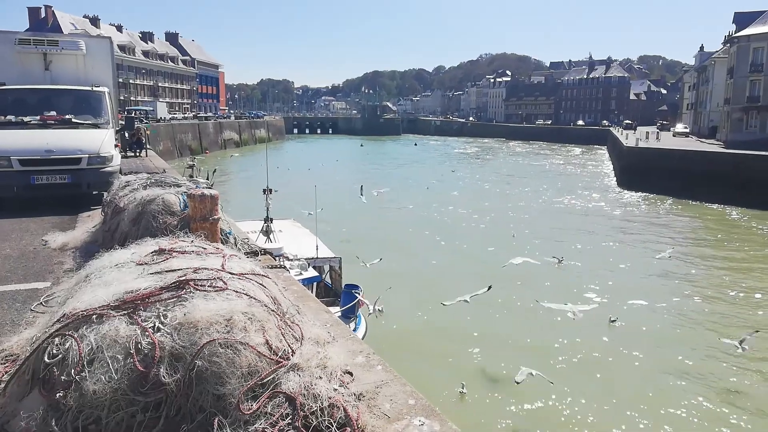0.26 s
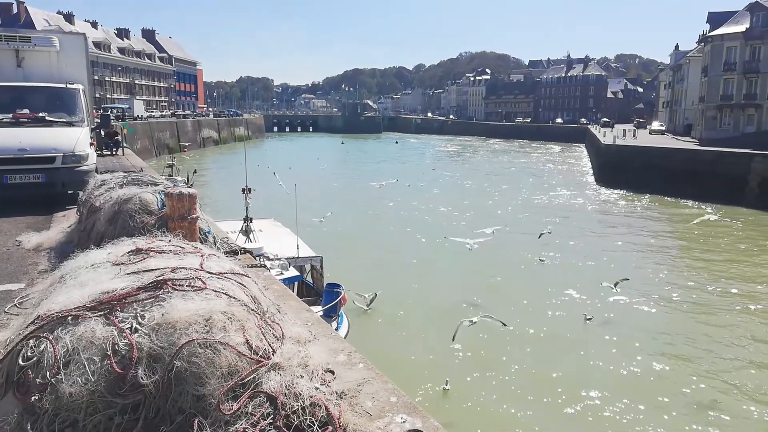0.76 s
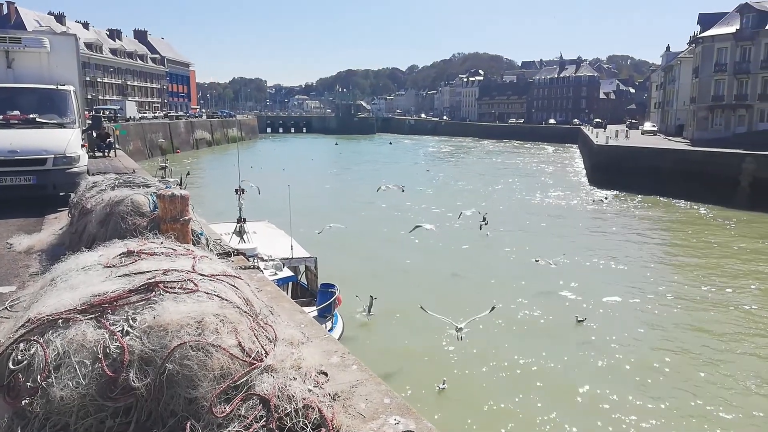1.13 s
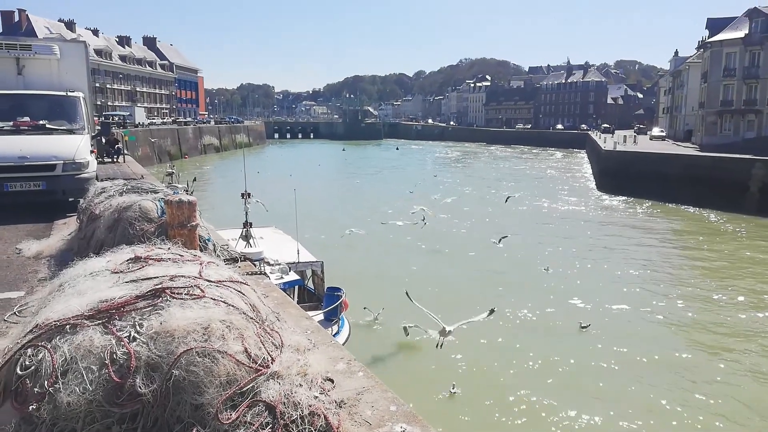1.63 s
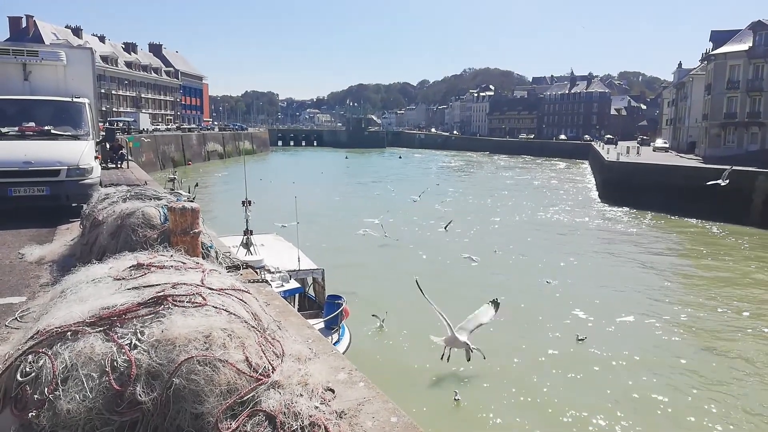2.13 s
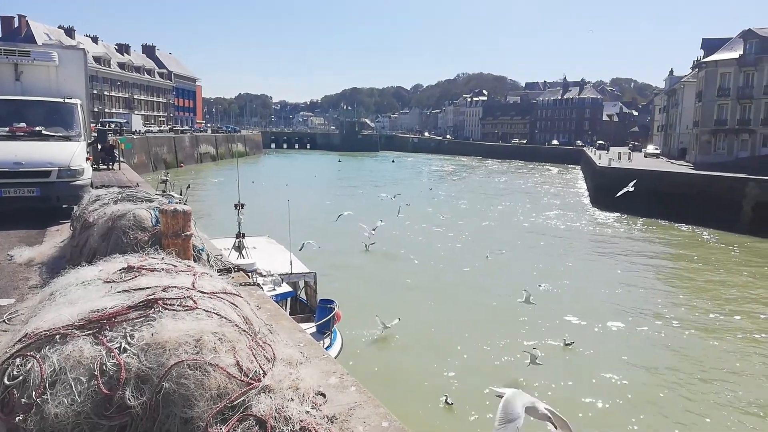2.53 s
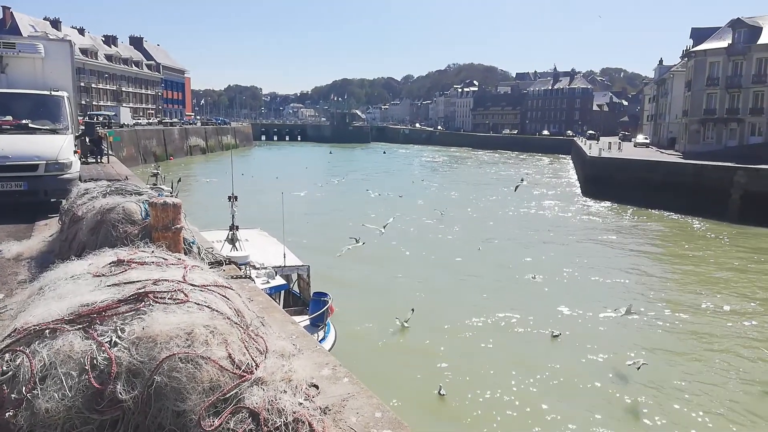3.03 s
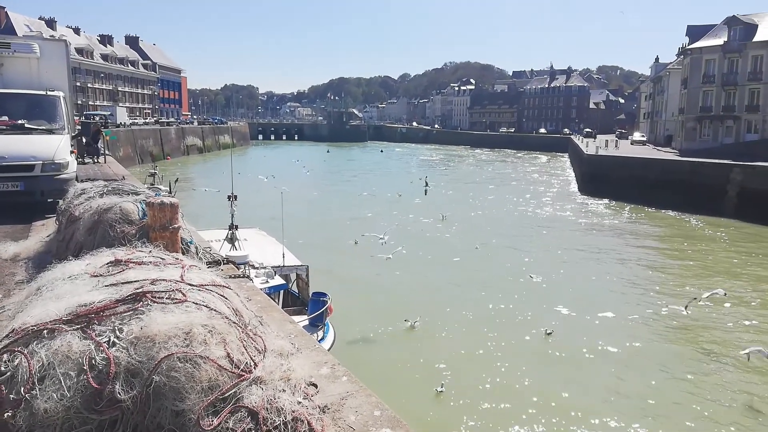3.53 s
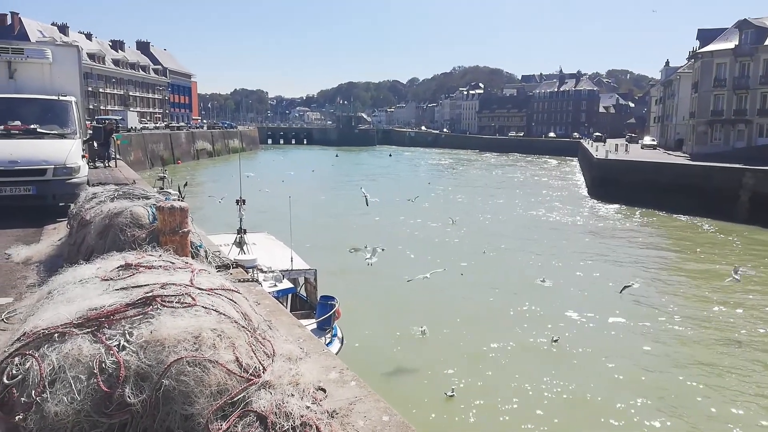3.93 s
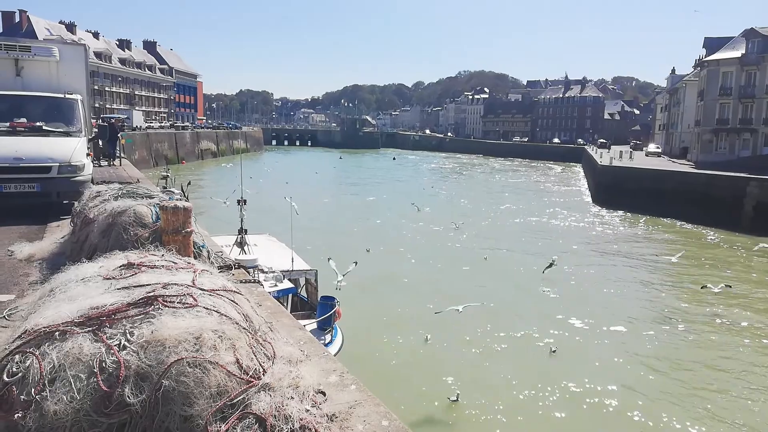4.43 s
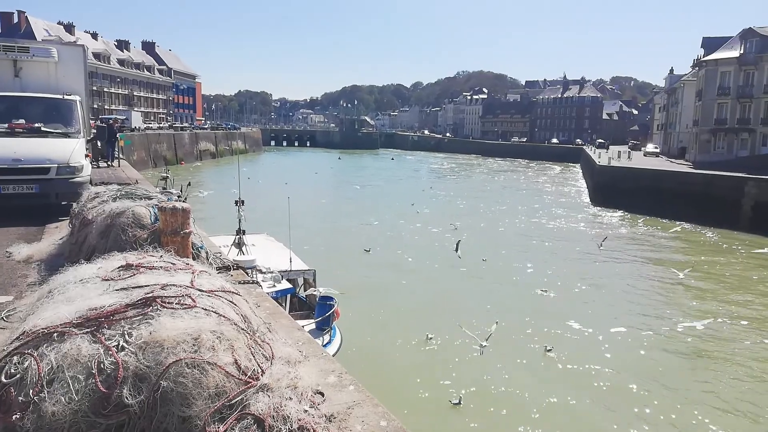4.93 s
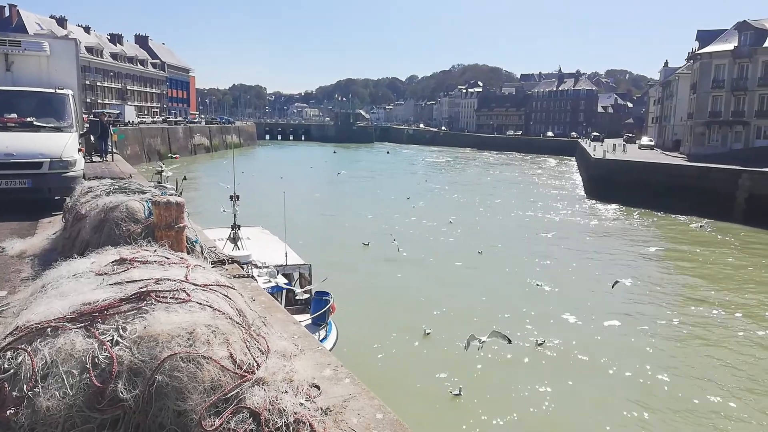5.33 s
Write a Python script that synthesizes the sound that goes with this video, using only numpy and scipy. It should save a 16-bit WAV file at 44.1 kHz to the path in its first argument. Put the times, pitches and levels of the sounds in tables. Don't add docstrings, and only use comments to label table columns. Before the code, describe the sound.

A harbour heard from the quay on a small stereo phone microphone. High gull whistles open, then wind buffets the microphone. From about two seconds a nearby gull gives clipped, falling chirps with croaky ends, three a second, while others mew further off. A boat diesel throbs very low throughout; late on, water washes harder against the wall.

```python
import sys
import numpy as np
from scipy import signal
from scipy.fft import rfft, irfft, next_fast_len
from scipy.io import wavfile
from scipy.ndimage import uniform_filter1d

SR = 44100
rng = np.random.default_rng(int(sys.argv[2]) if len(sys.argv) > 2 else 0)


def boost_factor(decibels):
    exponent = np.asarray(decibels, float) / 20
    return 10 ** exponent


def generate_wav(signal):
    frames = np.transpose(np.atleast_2d(signal))
    scaled = np.clip(frames, -1, 1) * 32767
    pcm = np.round(scaled).astype(np.int16)
    wavfile.write(sys.argv[1], SR, pcm)


N = 245751
TIME_S = np.arange(N) / SR

# start_s, length_s, first_hz, last_hz, level_db
WHISTLES = [(0.05, 0.028, 5350, 5200, -62), (0.079, 0.054, 4530, 4584, -47.5),
            (0.136, 0.114, 4590, 4385, -42), (0.264, 0.065, 3934, 3830, -50),
            (1.305, 0.11, 3724, 3526, -44), (1.452, 0.044, 3540, 3500, -64), (1.59, 0.05, 3680, 3600, -63),
            (1.709, 0.0497, 3620, 3550, -64), (1.482, 0.054, 5130, 5030, -62.5),
            (1.574, 0.062, 4990, 5110, -56), (1.642, 0.017, 5600, 5750, -54),
            (1.658, 0.012, 5730, 5350, -53), (1.656, 0.013, 5340, 5300, -52),
            (1.661, 0.023, 5280, 4930, -54)]
# pitch_hz, left_minus_right_db, left_lead_rad
WHISTLE_SIDE = [(3600, 25, 4.8), (3950, 17, 3.9), (4550, -6.5, 2.6), (5130, 6, 0.58)]
# start_s, length_s, first_hz, level_db
STEPS = [(0.112, 0.012, 4000, -55), (1.694, 0.0088, 3600, -42.5), (1.698, 0.014, 2780, -48),
         (1.702, 0.009, 5520, -54), (1.941, 0.013, 4600, -57), (1.972, 0.012, 5680, -50),
         (1.985, 0.011, 6200, -61), (2.333, 0.015, 4360, -54), (2.357, 0.008, 5500, -59),
         (2.677, 0.011, 3605, -37.5), (2.687, 0.007, 2860, -45), (2.979, 0.012, 4575, -53),
         (2.989, 0.017, 4450, -44), (3.013, 0.015, 5500, -59), (3.318, 0.02, 4600, -47.5),
         (3.348, 0.0135, 5550, -57), (3.646, 0.02, 4590, -58), (3.669, 0.011, 5670, -50),
         (3.685, 0.012, 5620, -56), (3.975, 0.024, 4130, -50), (4.007, 0.008, 2980, -50),
         (4.013, 0.016, 2230, -48), (4.025, 0.01, 5050, -61), (4.028, 0.021, 2920, -46),
         (4.32, 0.02, 2822, -63), (4.41, 0.022, 2230, -62), (4.438, 0.018, 3600, -53),
         (4.471, 0.0094, 3500, -52)]
# start_s, length_s, first_hz, last_hz, level_db
TURNED_STEPS = [
    (4.0135, 0.013, 4450, 4250, -35.5),
    (4.03, 0.015, 4380, 4200, -42),
    (2.815, 0.016, 4200, 3200, -46),
    (2.3, 0.065, 1100, 1180, -41.5),
    (2.368, 0.018, 1300, 1390, -38),
    (3.617, 0.026, 4600, 5400, -57),
]
# start_s, length_s, first_hz, last_hz, level_db, left_minus_right_db
SWOOPS = [
    (1.968, 0.02, 3050, 2740, -31, -4),
    (2.347, 0.021, 3650, 2620, -31, -6),
    (3.005, 0.024, 3650, 2660, -32, -2),
    (3.341, 0.017, 3300, 2680, -39, 5),
    (3.663, 0.017, 3400, 2740, -41, 10),
]
# start_s, length_s, first_hz, last_hz, level_db
YELPS = [
    (1.713, 0.015, 1355, 1540, -38.5),
    (4.026, 0.023, 1420, 1393, -39.5),
]
# start_s, length_s, first_hz, level_db, brightness_db
CROAKS = [
    (1.988, 0.018, 730, -44.5, -6),
    (2.368, 0.015, 688, -49, -2),
    (2.699, 0.018, 670, -45, 3),
    (3.029, 0.012, 668, -43, -2),
    (3.361, 0.015, 675, -42, -9),
    (3.68, 0.024, 705, -42, 0),
    (4.326, 0.016, 690, -59.5, 10),
    (5.559, 0.035, 697, -54.5, 9),
]
# freq_hz, gain_db
THROAT = [(1000, -8), (4500, 5.5), (5500, -12), (7000, -13.5), (9000, -40), (14000, -58)]
CROAK_PARTIALS_DB = [-20, -2, 4.5, -1, 1.5, -4, -14, -13]
# freq_hz, left_minus_right_db, left_lead_rad
BODY_SHADOW = [(700, 6, 2.7), (1400, 7, 5.2), (2100, 2, 3.1), (2800, -5, 4.0), (3400, 7, 2.3),
               (4400, 4, 3.3), (5500, -5, 6.1), (7000, -5, 5.5)]
# start_s, length_s, first_hz, last_hz, level_db
MEWS = [(0.209, 0.016, 1490, 1530, -44), (0.224, 0.021, 1640, 1760, -48), (0.346, 0.05, 3130, 3100, -56),
        (0.355, 0.096, 2220, 2140, -62), (0.356, 0.075, 998, 995, -48.5), (1.348, 0.059, 1048, 970, -47.5),
        (1.46, 0.082, 1102, 1160, -47.5), (1.338, .21, 1890, 2023, -46), (1.769, .21, 1974, 1913, -47),
        (2.157, 0.033, 1043, 965, -46), (2.165, 0.09, 1700, 1650, -48.5), (2.275, 0.028, 1700, 1630, -46),
        (2.319, 0.027, 1590, 1950, -40), (2.433, 0.013, 1990, 1900, -44), (2.45, 0.025, 3420, 3390, -52),
        (2.5, 0.11, 4550, 4550, -58), (2.699, 0.04, 3500, 3200, -56), (2.765, 0.02, 3840, 3730, -57.5),
        (4.055, 0.069, 1413, 1530, -47), (3.077, 0.21, 1667, 1542, -46.5), (4.131, 0.12, 1607, 1565, -43),
        (4.14, 0.21, 1045, 980, -43.5), (4.198, 0.13, 1299, 1323, -47), (4.297, 0.15, 1607, 1560, -48),
        (4.999, 0.08, 1460, 1470, -49), (5.0, 0.07, 2125, 2105, -51), (5.09, 0.07, 1950, 1846, -54),
        (5.161, 0.044, 1720, 1516, -44.5), (5.21, 0.029, 2180, 2190, -47.5),
        (5.273, 0.029, 2140, 2150, -49.5), (5.298, 0.026, 3680, 3720, -61),
        (5.299, 0.06, 2520, 2145, -49.5), (5.346, 0.043, 2036, 1840, -48), (5.412, 0.05, 1850, 1680, -51),
        (5.299, 0.0675, 1120, 1030, -54), (5.387, 0.063, 1092, 1014, -56)]
# pitch_hz, left_minus_right_db
MEW_SIDE = [(1000, -4), (1350, -4), (1650, 0), (2200, 2), (3800, 14)]
MEW_PARTIALS_DB = [-1, -30, -17, -39]
# start_s, length_s, first_hz, last_hz, level_db
LONG_CRY = [
    (5.204, 0.076, 1086, 1078, -55),
    (5.297, 0.0457, 1074, 1062, -51.5),
]
CRY_PARTIALS_DB = [-2, -3, 4, -20]
# start_s, peak_db, centre_hz, left_minus_right_db
TICKS = [
    (0.024, -46, 4300, 6),
    (0.0844, -45, 4280, 5),
    (0.1126, -52, 4300, 21),
    (0.1444, -49, 4350, 18),
    (0.1744, -48, 4320, 12),
    (0.2034, -47, 4270, 9),
    (0.5374, -58, 3800, -2),
    (5.561, -47, 3550, 2),
    (5.567, -36.5, 3270, 1),
]
# start_s, peak_db, centre_hz, left_minus_right_db
SNAPS = [(0.5372, -34, 8100, 6), (2.4538, -45, 9090, 6), (2.9931, -42, 9010, -3.5), (3.7948, -52, 9007, 10),
         (3.8262, -54, 9000, 2), (3.8611, -47, 9450, 1), (3.8716, -48, 9500, -9), (3.8991, -46, 9020, 2),
         (3.9395, -47, 8347, -4), (4.9696, -52, 9700, 7), (5.034, -41.5, 9018, 0.0),
         (5.4177, -42, 7640, -3), (5.4333, -41.5, 9900, 4), (5.4444, -49, 8390, -3), (5.464, -42, 9050, 5),
         (5.5019, -46, 9900, 2), (5.5464, -45, 9600, 2)]
# start_s, peak_db, centre_hz, left_minus_right_db
SLAPS = [
    (4.267, -43, 260, 0),
    (4.315, -51, 240.3, 2),
    (4.391, -45, 280, -2),
    (4.501, -47, 299.2, -6),
    (4.593, -47, 239.4, -3),
    (4.652, -47, 240, -1),
    (4.869, -52, 240, 3),
    (5.035, -46, 330, -3),
    (5.131, -52, 300.2, -2),
]
# time_s, firing_hz
DIESEL_SPEED = [(0, 42.46), (1.0, 42.69), (1.2, 41.08), (1.6, 41.22), (2.0, 42.38), (2.3, 40.92),
                (3.05, 40.94), (3.5, 39.5), (4.9, 39.38), (5.2, 37.97), (5.57, 37.9)]
# time_s, level_db, first_over_second_order_db
THROB = [(0, -53, 11.5), (.15, -35.5, 4), (.3, -47.5, 7), (.66, -32, 0.5), (.75, -42.5, 5), (1.27, -38, -5),
         (1.41, -42, -4), (1.58, -35.5, 9.5), (1.76, -46, -3), (2.05, -33.5, 0), (2.3, -45.5, -13),
         (2.6, -33.5, -15), (3.1, -41, 7), (3.52, -34, 1), (3.66, -47.5, 12), (3.97, -38, -5),
         (4.12, -39.5, 4.5), (5.57, -48, 11)]
# multiple, under_second_order_db
HIGH_ORDERS = [(3, -18), (4, -22), (5, -18), (6, -22), (7, -26), (8, -25.5)]
# time_s, lift_db
LOAD = [(0, 2), (1.2, 3), (2.5, 3), (4, -2), (5.57, -1)]
# time_s, lift_over_calm_db, fade_s
GUSTS = [(.53, -1, 0.14), (.94, 9.5, 0.081), (1.12, 20, 0.02), (1.193, 24, 0.024), (1.289, 22, 0.037),
         (1.52, 32.5, 0.0059), (1.6, 17, 0.025), (1.901, 0, 0.26), (2.05, 14, 0.097), (2.7, 2.5, 0.65),
         (3.66, 2, 0.012), (3.86, 2, 0.018), (4.03, 1.5, 0.075), (4.19, 6.5, 0.029), (4.281, 18.5, 0.0084),
         (4.44, 12, 0.069), (4.54, 16, 0.1), (4.87, 4, 0.05), (5.18, 0, 0.0058), (5.32, -2, 0.085),
         (5.541, 4, 0.039)]
# time_s, level_db
HARBOUR = [(0, 0), (.9, 1), (1.2, 2), (2.0, 1), (2.35, 2.5), (2.9, 2), (3.3, -0.5), (3.55, -2), (3.95, -4),
           (4.2, -3), (4.5, -3.5), (4.6, -6), (4.8, -7), (4.9, -9), (5.1, -4.5), (5.3, -5.5), (5.57, -6.5)]
# start_s, rise_s, hold_s, lift_db
WAVES = [
    (2.62, 0.04, 0.017, 1),
    (2.79, 0.24, 0.36, 4.5),
    (3.199, 0.17, 0.054, 6),
    (4.06, 0.17, 0.23, 17),
    (4.584, 0.04, 0.16, 6.5),
    (5.025, .12, 0.051, 16.5),
    (5.265, 0.12, 0.057, 8),
]
HARBOUR_SHARE = [0.95, 1, 0.78]
WAVE_SHARE = [0.094, 0.44, 0.8]
SWELL_HZ = [45, 170, 420, 1500, 4000, 8500]
# freq_hz, density_db_per_hz, left_minus_right_db
BED = [(25, -4.5, -1), (96, -2.5, -1), (258, -12.5, -0.5), (560, -17, 1), (677, -17.5, 8), (1160, -16, 0.5),
       (1700, -16.5, 4), (2440, -21.5, 0.5), (3600, -23.5, -2), (6100, -30.5, -1.5), (7980, -30.5, 0.5),
       (9440, -26, 1.5), (10960, -35.5, 2.5), (15600, -46.5, -8)]
# freq_hz, share
ALIKE = [(50, 1), (130, 1), (300, 0.76), (700, 0.88), (1200, 0.23), (2000, 0.084), (4000, 0.17),
         (9000, 0.24)]
# time_s, lag_samples
TOWN_LAG = [(0, 15.5), (2.4, 14.9), (3.8, 7.2), (5.57, 16.4)]
WATER_LAG = [(0, 14.5), (2.2, 18), (2.6, -13.5), (4.5, -24), (5.57, -4.5)]
# freq_hz, width_hz, gain_db
PORT_DIPS = [
    [(1325, 130, -9.5), (5900, 760, -6.5)],
    [(2435, 185, -14.5), (5200, 300, -7)],
]


def curve(x, table, column=1):
    return np.interp(x, np.array(table)[:, 0], np.array(table)[:, column])


def spectrum(hz, table, column=1):
    return np.interp(np.log(hz), np.log(np.array(table)[:, 0]), np.array(table)[:, column])


def walk(rate_hz, size=N):
    hold = int(SR / rate_hz)
    held = np.repeat(rng.standard_normal(size // hold + 2), hold)
    return 1.216 * uniform_filter1d(uniform_filter1d(held, hold), hold)[:size]


def add(out, start_s, sound):
    i = int(start_s * SR)
    out[:, i:i + sound.shape[1]] += sound[:, :N - i]


def note(row, partials_db, main=1, rough=0.1, wobble=0.009, bend=1.46, rise=0.086, fall=0.25,
         creak=0.0, near=True, far_lead_rad=1.68):
    start_s, length_s, first_hz, last_hz, level_db, pan_db = row
    u = np.linspace(0, 1, int(1.2 * length_s * SR))
    glide_hz = last_hz + (first_hz - last_hz) * (1 - u) ** bend
    hz = glide_hz * (1 + wobble * walk(191.3, len(u)))
    phase = 2 * np.pi * (np.cumsum(hz) / SR + rng.random())
    ramp = np.clip(np.minimum(u / rise, (1 - u) / fall), 0, 1)
    shape = np.sin(np.pi / 2 * ramp) * np.sqrt(2)
    shape = shape * (1 + creak * np.clip(4 * (u - 0.45), 0, 1) * np.cos(phase / 2))
    sides = np.array([[1], [-1]]) / 2
    out, mean_hz = 0, hz.mean()
    for k, part_db in enumerate(partials_db, 1):
        tilt_db, lead_rad = 0, far_lead_rad * k
        if near:
            tilt_db = spectrum(k * hz, BODY_SHADOW) - spectrum(main * mean_hz, BODY_SHADOW)
            lead_rad = spectrum(k * hz, BODY_SHADOW, column=2)
        depth = rough * (0.5 + u) * (1 + 0.67 * (k - 1) * near)
        flutter = 1 + depth * walk(500, len(u))
        level = boost_factor(level_db + part_db + sides * (pan_db + tilt_db))
        out = out + level * flutter * np.sin(k * phase + 0.577 * k * k + sides * lead_rad)
    return start_s - length_s / 25, out * shape


def overtones_db(hz):
    return spectrum(np.arange(1, 4) * hz, THROAT) - spectrum(hz, THROAT)


def near_gull(out):
    chirp_steps(out)
    for row in SWOOPS:
        add(out, *note(row, MEW_PARTIALS_DB[:2], rough=0.12, wobble=0.005, bend=4, rise=0.35, fall=0.35))
    for row in YELPS:
        add(out, *note((*row, 11), MEW_PARTIALS_DB, rough=0.38, wobble=0.019, rise=0.28, fall=0.43))
    croaks(out)
    whistles(out)


def chirp_steps(out):
    sag = 0.045
    effort_db, brighten_db_per_db = -37, 0.8
    for start_s, length_s, hz, level_db in STEPS:
        pan_db = spectrum(hz, BODY_SHADOW) + 1 + 3.5 * (hz < 2400)
        row = (start_s, length_s, hz, hz * (1 - sag), level_db, pan_db)
        dull_db = brighten_db_per_db * min(level_db - effort_db, 0) * np.array([0, 1, 1])
        add(out, *note(row, overtones_db(hz) + 7.1 + dull_db, rough=0.2, wobble=0.008, rise=0.07, fall=0.5))
    for row in TURNED_STEPS:
        add(out, *note((*row, 5), MEW_PARTIALS_DB[:2], rough=0.3, wobble=0.01, rise=0.041, fall=0.5,
                       near=False, far_lead_rad=4.2))


def croaks(out):
    sag = 0.051
    for start_s, length_s, hz, level_db, bright_db in CROAKS:
        partials_db = np.array(CROAK_PARTIALS_DB) + bright_db * (np.arange(8) >= 3)
        row = (start_s, length_s, hz, hz * (1 - sag), level_db, 2.5)
        add(out, *note(row, partials_db, main=3.36, rough=0.3, wobble=0.015, rise=0.12, fall=0.5, creak=0.5))


def whistles(out):
    for row in WHISTLES:
        hz = row[2]
        pan_db, lead_rad = spectrum(hz, WHISTLE_SIDE), spectrum(hz, WHISTLE_SIDE, column=2)
        add(out, *note((*row, pan_db), overtones_db(hz) + 4.1, rough=0.05, wobble=0.0017, bend=1.56,
                       rise=0.22 + 0.63 * (hz < 3800), fall=0.1, near=False, far_lead_rad=lead_rad))


def far_gulls(out):
    for row in MEWS:
        add(out, *note((*row, spectrum(row[2], MEW_SIDE)), MEW_PARTIALS_DB, rough=0.78, wobble=0.0346,
                       bend=1.14, rise=0.031, fall=0.31, near=False))
    pip_hz, pip_gap_s = 3870, 0.024
    for start_s in np.arange(2.06, 2.29, pip_gap_s):
        late, loud = rng.standard_normal(2)
        row = (start_s + 0.0033 * late, 0.011, pip_hz, 0.97 * pip_hz, -51 + 2.17 * loud, 12)
        add(out, *note(row, MEW_PARTIALS_DB[:1], rough=0.55, wobble=0.015, rise=0.26, fall=0.5, near=False))
    for row in LONG_CRY:
        add(out, *note((*row, 3.5), CRY_PARTIALS_DB, rough=0.4, wobble=0.008, fall=0.65, near=False))


def flock(out):
    for start, size, pitch, glide, loud, side in rng.random((90, 6)):
        start_s, hz = 0.05 + start * 5.4, 1000 * 2.1 ** pitch
        level_db = -56.5 + 7 * loud + curve(start_s, HARBOUR)
        last_hz = hz * (0.8 + 0.33 * glide)
        row = (start_s, 0.0297 + 0.0903 * size, hz, last_hz, level_db, 10 * (side - 0.5))
        add(out, *note(row, MEW_PARTIALS_DB[:2], rough=0.33, wobble=0.0342, rise=0.58, fall=0.58, near=False))


def ticks(out):
    t = np.arange(600) / SR
    for table, decay_s, width in ((TICKS, 0.003, 0.5), (SNAPS, 0.0009, 0.45), (SLAPS, 0.006, 1.0)):
        for start_s, peak_db, hz, pan_db in table:
            edges_hz = np.clip([hz * (1 - width / 2), hz * (1 + width / 2)], 120, 11500)
            resonance = signal.butter(1, edges_hz, "band", fs=SR, output="sos")
            strike = rng.standard_normal((2, 600)) * np.exp(-t / decay_s)
            burst = signal.sosfilt(resonance, strike)
            burst = burst / np.abs(burst).max(axis=1, keepdims=True)
            sides_db = np.array([[pan_db], [-pan_db]]) / 2
            add(out, start_s + 0.00066, burst * boost_factor(peak_db + 10 + sides_db))


def quay(x, wet_db=-17, t60_s=0.24):
    t = np.arange(int(0.5 * SR)) / SR
    tail = rng.standard_normal((2, len(t))) * np.exp(-np.log(1000) * t / t60_s) * (t > 0.008)
    tail = tail / np.sqrt(np.sum(tail ** 2, axis=1, keepdims=True))
    return x + boost_factor(wet_db) * signal.fftconvolve(x, tail, axes=1)[:, :N]


def diesel():
    firing_hz = curve(TIME_S, DIESEL_SPEED) * (1 + 0.0213 * walk(10))
    phase = 2 * np.pi * np.cumsum(firing_hz) / SR
    trade_db = 2 * walk(11)
    level_db = curve(TIME_S, THROB)
    first = boost_factor(level_db + curve(TIME_S, THROB, column=2) - 2.5 + trade_db) * np.sqrt(2)
    second = boost_factor(level_db - 0.5 - trade_db) * np.sqrt(2)
    upper = sum(boost_factor(db + 2.04 * walk(5)) * np.sin(k * phase + k * k) for k, db in HIGH_ORDERS)
    drone = first * np.sin(phase) + second * np.sin(2 * phase + 1)
    drone = drone + second.mean() * boost_factor(curve(TIME_S, LOAD)) * upper
    return np.array([drone, np.interp(TIME_S - 0.0004, TIME_S, drone)])


def gusts():
    puffs = sum(boost_factor(db) * np.exp(-np.abs(TIME_S - s) / fade_s) for s, db, fade_s in GUSTS)
    return 20 * np.log10(1 + puffs)


def waves():
    fall_s, lift_db = 0.13, 0
    for start_s, rise_s, hold_s, db in WAVES:
        rising = (TIME_S - start_s) / rise_s
        falling = 1 + (start_s + rise_s + hold_s - TIME_S) / fall_s
        lift_db = lift_db + db * np.clip(np.minimum(rising, falling), 0, 1)
    return lift_db


def swell_levels():
    wind, harbour, surf = gusts(), curve(TIME_S, HARBOUR), waves()
    town, wash, spray = (a * harbour + b * surf for a, b in zip(HARBOUR_SHARE, WAVE_SHARE))
    swells_db = np.array([wind, wind, town, town, wash, spray])
    swells_db = swells_db - np.median(swells_db, axis=1, keepdims=True)
    swells_db[0] *= 0.55
    return swells_db


def port_spectra(size, f):
    shared, left, right = rng.standard_normal((3, size))
    index = np.arange(size)

    def lagged(table):
        lag = np.round(curve(index / SR, table)).astype(int)
        return rfft(shared[index - lag - 40])

    far_side = np.where(f < 5500, lagged(TOWN_LAG), lagged(WATER_LAG))
    detour = np.exp(-2j * np.pi * f * 14 / SR / (1 + (f / 900) ** 4))
    alike = np.clip(spectrum(f, ALIKE), 0, 1)
    common, own = np.sqrt(alike), np.sqrt(1 - alike)
    pan = boost_factor(spectrum(f, BED, column=2) / 2)
    colour = boost_factor(spectrum(f, BED)) * (f > 18) * boost_factor(-3 * np.exp(-np.log(f / 400) ** 2))
    left_port = (common * rfft(np.roll(shared, 40)) + own * rfft(left)) * pan
    right_port = (common * far_side * detour + own * rfft(right)) / pan
    dips_db = [sum(db / (1 + (2 * (f - hz) / width) ** 2) for hz, width, db in port) for port in PORT_DIPS]
    return (np.array([left_port, right_port]) * colour * boost_factor(np.array(dips_db))).astype(np.complex64)


def background():
    size = next_fast_len(N)
    f = np.maximum(np.arange(size // 2 + 1) * SR / size, 1)
    ports, swells_db = port_spectra(size, f), swell_levels()
    droplets = walk(23.93)
    out, band_position = 0, 2.5 * np.log2(f / 20)
    for k in range(25):
        hz = 20 * 2 ** (k / 2.5)
        share = np.array([np.interp(np.log(hz), np.log(SWELL_HZ), row) for row in np.eye(6)])
        slow_db = 2.5 * walk(14) if hz < 300 else 1.4 * walk(9)
        flicker_db = slow_db + 0.88 * walk(40) + 1.01 * share[5] * droplets
        window = np.cos(np.pi / 2 * np.clip(band_position - k, -1, 1)) ** 2
        band = irfft(ports * window.astype(np.float32), size)[:, :N]
        out = out + boost_factor(share @ swells_db + flicker_db) * band
    return out * boost_factor(-36) / out.std()


def scene():
    birds = np.zeros((2, N))
    near_gull(birds)
    far_gulls(birds)
    flock(birds)
    ticks(birds)
    return quay(birds) + diesel() + background()


def roll_off(x):
    return signal.sosfilt(signal.butter(12, 15810, fs=SR, output="sos"), x)


def record(dry):
    soft = signal.sosfilt(signal.butter(4, 15000, fs=SR, output="sos"), dry)
    mix = signal.sosfilt(signal.ellip(10, 0.2, 80, 15720, fs=SR, output="sos"), soft)
    return roll_off(mix)


dry = scene()
out = record(dry)
generate_wav(out)
```